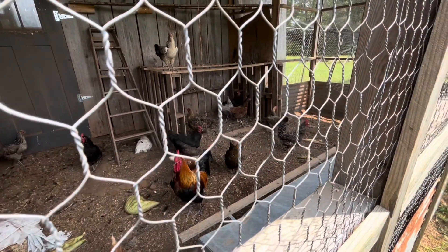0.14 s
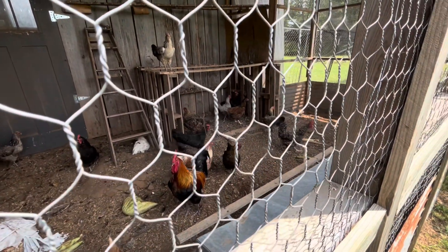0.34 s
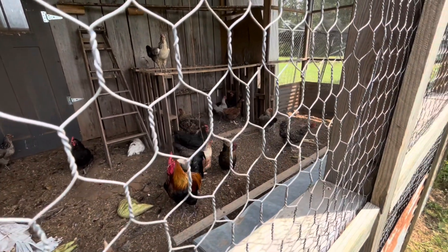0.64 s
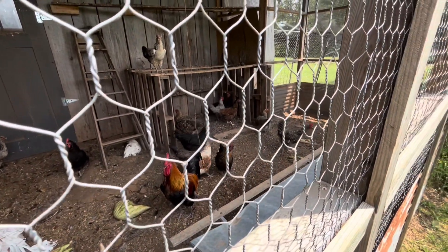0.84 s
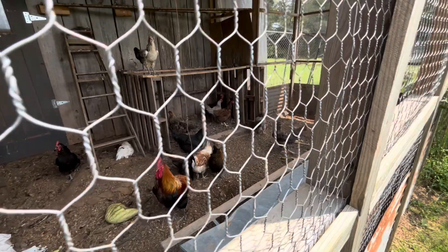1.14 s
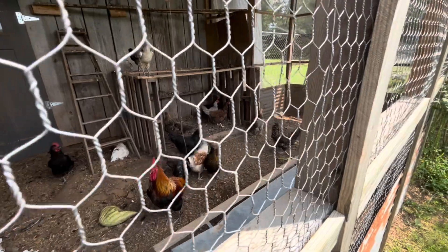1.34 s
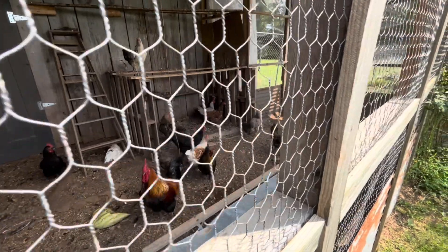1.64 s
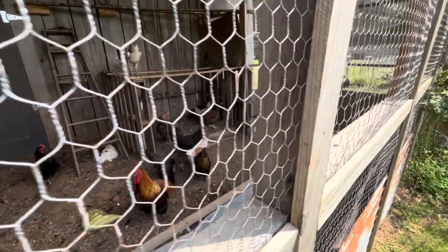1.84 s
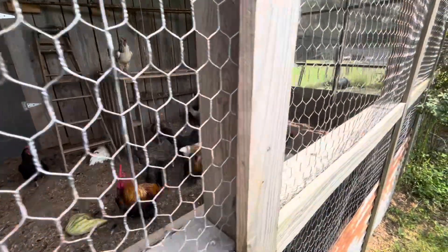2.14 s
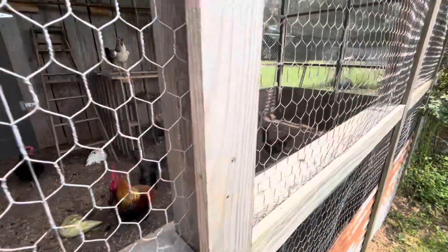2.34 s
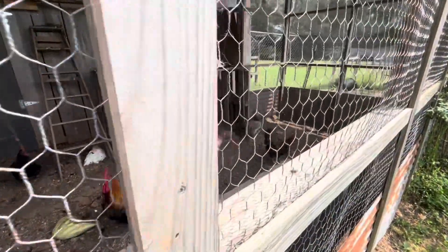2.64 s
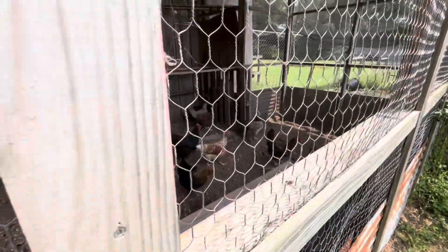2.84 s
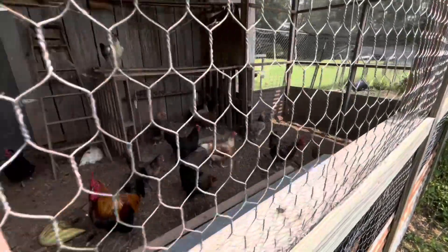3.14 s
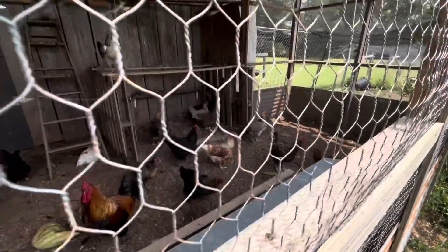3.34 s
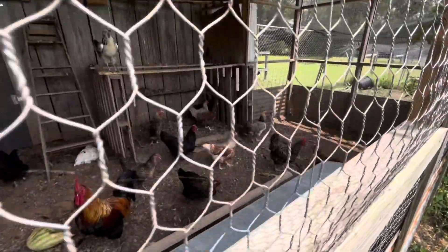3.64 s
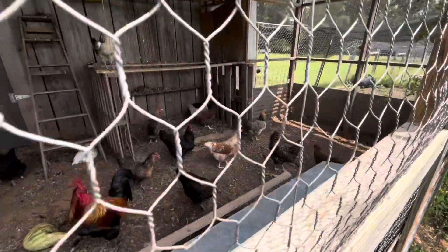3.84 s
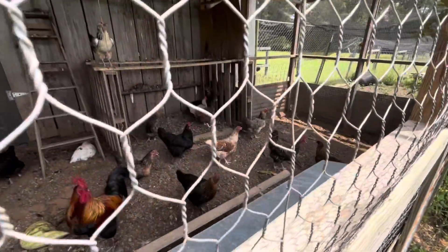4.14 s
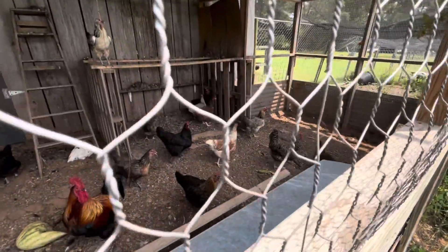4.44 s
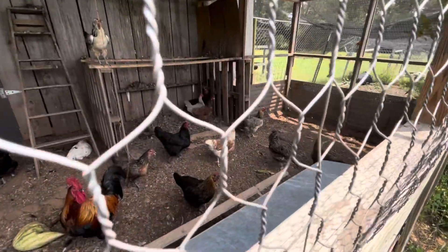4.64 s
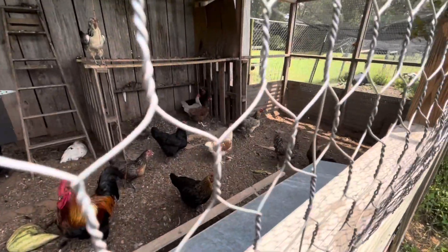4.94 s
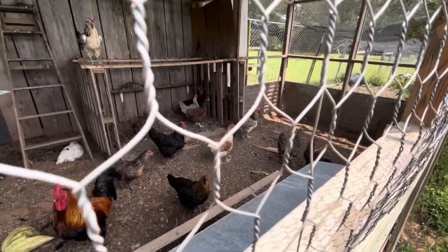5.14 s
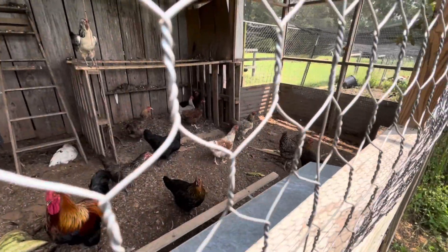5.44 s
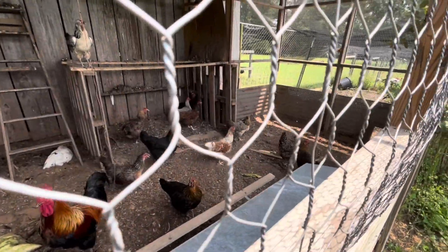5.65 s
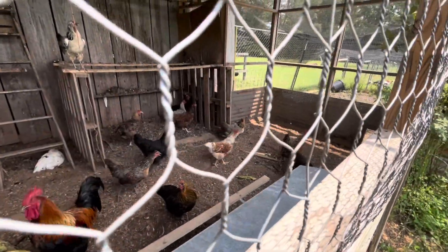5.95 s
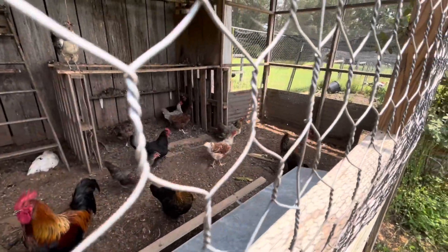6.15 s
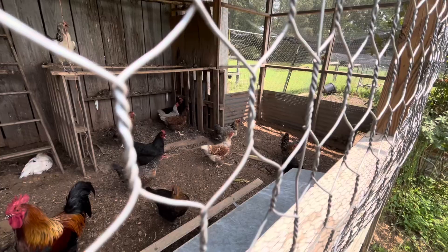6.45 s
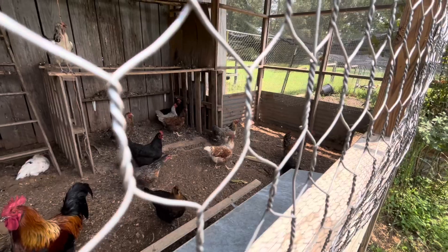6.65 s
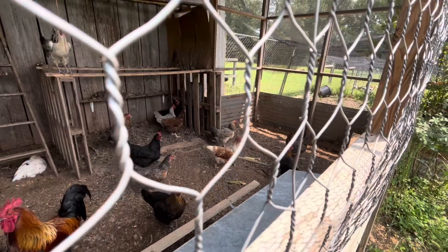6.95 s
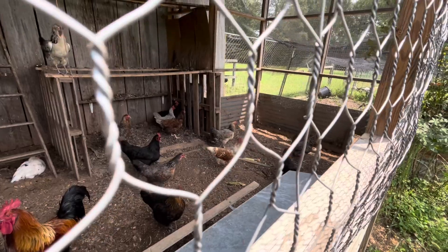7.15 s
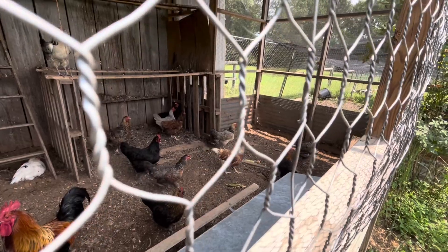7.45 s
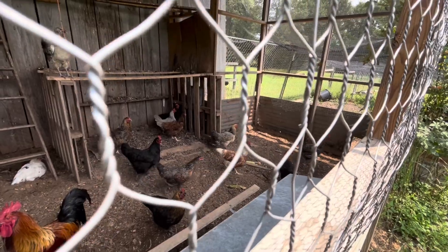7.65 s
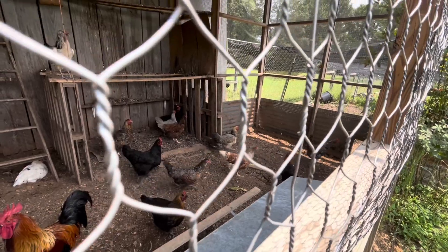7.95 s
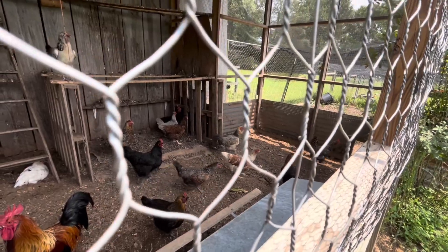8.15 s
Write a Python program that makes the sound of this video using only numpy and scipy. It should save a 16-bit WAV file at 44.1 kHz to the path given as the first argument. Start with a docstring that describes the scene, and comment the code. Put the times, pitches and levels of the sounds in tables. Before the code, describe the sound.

A quiet farmyard, heard in stereo through the wire of an open wooden coop. A faint low engine hum, uneven distant roar and fine insect hiss run throughout, with tiny high chirps near 0.1, 0.3, 1.8 and 2.5 s. From 0.6 s a hen gives short, rough, hollow clucks under a tenth of a second long, roughly every third of a second, with a small dry knock at 2.6 s. At 3.3 s a nearby small bird begins a rapid, thin trill of falling notes, swelling by 4.2 s and lasting until 6.5 s. Clucking pauses after 3.7 s and resumes at 5 s. Faint gliding whistles from another bird echo from 5.1 to 6.1 s. Brisk clucks continue to 7.3 s, with a last one near 8 s; low wind bumps stir the rumble from 6.2 to 7.5 s. A faint engine whine rises briefly around 3 s.

```python
"""An open wooden coop, heard through the wire from outside, where a hen clucks in short bursts.
Each cluck is rough pulses and breath noise ringing a throat and beak, with the coop's short tail.
Nearby, one small bird trills in fast falling sweeps, another whistles phrases of gliding tones,
and a third gives faint rising chirps. A far engine hums as a few low sines;
shaped noise makes its roar and whine, the rumble lifted by wind, and insects hissing in the grass."""
import sys
import numpy as np
from scipy import signal
from scipy.io import wavfile
from scipy.ndimage import uniform_filter1d

SR = 44100
rng = np.random.default_rng(int(sys.argv[2]) if len(sys.argv) > 2 else 0)


def dump_mix(stems):
    """Bounce the given channels to the path in sys.argv[1] as a 16-bit WAV at rate SR."""
    frames = np.atleast_2d(stems).T  # one column per channel
    limited = np.clip(frames, -1, 1)  # hard clip at full scale
    pcm = np.round(limited * 32767).astype(np.int16)
    wavfile.write(sys.argv[1], SR, pcm)


N = 365544  # length in samples

# Levels in the tables are relative; hen, whistles and background layers are trimmed further
# in their functions.
# Hen's clucks, and one short knock-like tap at 2.631 s: start_s, rise_s (to the loudest point),
# length_s, top_db, open_db (start against top), pitch_hz, throat_hz (resonance), rough (0-1),
# bright_db (beak), rasp_db, chest_db (clean fundamental)
CLUCKS = [(0.638, 0.028, 0.081, -24.5, -7.5, 364, 1030, 0.34, 3, -24, -22),
          (0.978, 0.036, 0.066, -41, -5, 255.5, 898, 0.38, -4, -35, -4.5),
          (1.088, 0.038, 0.085, -29, -1.5, 373.2, 956, 0.41, 6, -21, -24),
          (1.350, 0.035, 0.063, -28.5, -1, 272.3, 986, 0.48, 2.5, -23, -36),
          (1.621, 0.031, 0.093, -26, -2, 359.8, 1007, 0.46, 1, -22.5, -19),
          (1.926, 0.038, 0.085, -25, -2.5, 359, 994, 0.45, 2.5, -24, -17),
          (2.234, 0.021, 0.042, -29, -1.5, 264.3, 960, 0.08, -1.5, -21, -21),
          (2.269, 0.07, 0.081, -29.5, 3, 344.6, 997, 0.24, -0.5, -18.5, -11.5),
          (2.631, 0.0021, 0.019, -36, -10, 252.4, 953, 0.46, 3.5, -26, -12),
          (2.904, 0.054, 0.096, -25.5, -2.5, 260.2, 967, 0.28, 2.5, -22, -21),
          (3.286, 0.054, .103, -27.5, -2.5, 337.3, 988, 0.48, 3, -20.5, -16),
          (3.676, 0.053, 0.091, -27.5, -1, 262.4, 1027, 0.38, 4.5, -19.5, -22),
          (5.004, .036, 0.085, -28.5, -0.5, 260.5, 1010, 0.51, 2, -25, -23),
          (5.416, 0.043, 0.068, -25.5, -5.5, 264.2, 1037, 0.46, 1, -23, -22.5),
          (5.877, 0.021, .074, -28, -3.5, 279.2, 1040, 0.46, 6, -18.5, -32),
          (6.147, 0.027, 0.072, -24, -5, 350, 1050, 0.47, 4, -25.5, -25),
          (6.452, 0.023, 0.083, -23, -9.5, 358.8, 1082, 0.4, 3.5, -24.5, -18),
          (6.754, 0.031, 0.054, -28.5, -5, 231.5, 1001, 0.37, 3.5, -19.5, -31),
          (7.027, 0.029, 0.073, -25, -4.5, 357, 1032, 0.51, 5.5, -22, -28),
          (7.33, 0.025, 0.056, -26, -6.5, 266.1, 1016, 0.48, 3, -22.5, -22),
          (7.956, 0.0063, 0.068, -29, -8, 209, 1052, 0.44, 1, -21, -32)]
# Throat resonances: factor (on throat_hz), width_hz, level_db
THROAT_MODES = [(0.804, 196, -1.5), (1.016, 174, 7.5), (1.243, 233.3, -3.5)]
# Fixed beak resonances: centre_hz, width_hz, level_db
BEAK_MODES = [(250, 240, -29), (480, 260, -35), (1600, 400, -26), (2100, 350, -26), (5500, 3000, -38),
              (12000, 6000, -43)]
# Upper tract resonances that open with the beak: centre_hz, width_hz, level_db
RASP_MODES = [(2938, 570, -1), (3320, 560, -1), (4000, 880, -9.5), (5410, 420, -15)]
# Coop tail: frequency_hz, decay_s (time to fall 60 dB)
COOP_DECAY = [(300, 0.18), (1000, 0.17), (3500, 0.13), (9000, 0.047)]
# Every fourth trill note, the rest evenly spaced between: loudest_s, peak_db
TRILL_NOTES = [(3.3289, -51), (3.553, -45), (3.7704, -44), (3.991, -41), (4.2105, -37.5), (4.4294, -38.5),
               (4.652, -40), (4.878, -41), (5.1039, -42), (5.3298, -40.5), (5.56, -40), (5.7945, -44.5),
               (6.0404, -43), (6.279, -42.5), (6.5151, -50.5)]
# Whistled notes: start_s, length_s, from_hz, to_hz, glide (share of the note spent gliding), level_db
WHISTLES = [(5.129, .04, 2560, 2470, 1, -81), (5.18, 0.061, 3020, 3360, 0.65, -72.5),
            (5.257, 0.048, 2400, 2515, 0.75, -73.5), (5.331, 0.13, 4220, 2930, 0.98, -65),
            (5.493, 0.08, 4340, 4700, 0.91, -64), (5.583, 0.045, 2440, 2515, 0.9, -73),
            (5.646, 0.033, 2740, 3210, 0.62, -62), (5.714, 0.053, 2369, 2540, 0.52, -68),
            (5.795, .115, 4060, 2990, 0.98, -61.5), (5.947, 0.071, 4030, 4820, 0.49, -56),
            (6.034, 0.055, 2510, 2450, 0.94, -71), (6.105, .035, 2760, 3190, .55, -58.5)]
# Faint high chirps: start_s, length_s, from_hz, to_hz, level_db
CHIRPS = [(0.103, 0.044, 7400, 7930, -57), (0.265, .05, 7300, 7700, -62), (1.776, 0.042, 6900, 7500, -61),
          (2.475, 0.014, 6400, 7500, -55)]
# Engine hum over time: time_s, second_order_db, fifth_order_db
ENGINE_LEVELS = [(0, -53.5, -66), (.75, -54, -61.5), (1.0, -54.5, -67.5), (1.6, -52.5, -62),
                 (1.75, -51.5, -67), (2.05, -50.5, -58), (2.4, -53, -69), (2.95, -53.5, -54),
                 (3.12, -53.5, -61.5), (3.32, -52.5, -50), (3.53, -55.5, -65.5), (3.81, -54.5, -54),
                 (4.2, -56.5, -66), (4.6, -55.5, -63.5), (5.0, -54.5, -61), (5.6, -54.5, -55.5),
                 (5.9, -51, -63), (6.26, -54, -50), (6.5, -56, -62), (6.9, -59, -58.5), (7.25, -52.5, -68),
                 (7.58, -55.5, -55.5), (7.94, -54.5, -67), (8.29, -56.5, -58)]
# Other engine orders, following the second: order, level_db (against the second)
ENGINE_ORDERS = [(3, -17), (4, -36), (6, -15.5)]
# Background over time: time_s, rumble_db, roar_db, insects_db, whine_db
AIR_LEVELS = [(0.0, -64, -63, -63, -73), (0.55, -62, -61, -63, -68), (0.95, -65, -63, -64.5, -78),
              (1.3, -60.5, -60, -63, -62), (1.95, -58, -57, -59, -65), (2.55, -59.5, -64, -60.5, -83),
              (3.05, -64, -57, -61.5, -57.5), (3.4, -57, -58.5, -60, -79), (3.85, -57.5, -54, -61.5, -68),
              (4.45, -64.5, -65, -62.5, -82), (4.8, -63.5, -61, -62.5, -66), (5.4, -59, -63, -60.5, -67.5),
              (5.9, -55.5, -58, -60, -91), (6.55, -53.5, -56.5, -60, -85), (7.0, -57, -62, -61.5, -80),
              (7.25, -65, -63.5, -61, -79), (7.55, -56.5, -59.5, -59.5, -81),
              (8.29, -65, -62, -56.5, -91.5)]
# Wind briefly lifting the rumble: time_s, lift_db
GUSTS = [(6.22, 3.4), (6.55, 4.4), (6.74, 6), (7.03, 9.2), (7.46, 6.8)]
# Colour of the low rumble: frequency_hz, density_db
RUMBLE_COLOUR = [(25, -33), (40, -29), (70, 6), (120, -5.5), (200, -11.5), (350, -14), (700, -55)]
# Colour of the far engine roar: frequency_hz, density_db
ROAR_COLOUR = [(110, -31.5), (180, -22), (195, -18), (237, 2.5), (282, -17.5), (339, -0.5), (517, -2.5),
               (574, -5), (852, 0.5), (1220, -2), (2010, -9.5), (2650, -11.5), (4200, -16), (5460, -22.5),
               (9240, -120)]
# Colour of the insect hiss: frequency_hz, density_db
INSECT_COLOUR = [(1470, -75), (2500, -1), (3720, -63), (4010, -8.5), (5660, -5.5), (6010, -1.5), (6740, 2),
                 (7610, 4), (9010, 9.5), (10700, 0.5), (13900, -12), (14700, -5), (15500, -45)]
# Colour of the engine whine: frequency_hz, density_db
WHINE_COLOUR = [(1300, -20), (1650, -18.5), (1850, -16.5), (2030, -11.5), (2200, -30), (2500, -43)]
# Left-right likeness of the background: frequency_hz, likeness (0-1)
AIR_LIKENESS = [(60, 0.14), (250, 0.74), (1000, 0.067), (3000, 0.72), (6000, 0.21), (9000, 0.1),
                (11000, 0.94), (13000, 0.88)]
# Left-right balance of the background: frequency_hz, left_minus_right_db
AIR_BALANCE = [(60, 1), (250, 1), (1000, 3), (3000, 0.5), (6000, 4), (9000, -6), (12000, -0.5), (15000, 1)]
# Left-right phase of the background: frequency_hz, left_lead_rad
AIR_LEAD = [(0, -3.5), (1000, 1.12), (3000, 2.5), (6000, 0.8), (11000, 2.08), (15000, -4.2)]

FADE_DB, FADE_BEND = -20.5, 1.24  # cluck's fall from loudest point to end, steeper late
POP_DB, POP_S = 4, 0.0087  # held air bursts out at the start: boost and its decay constant
# Start-to-end changes in a cluck: pitch sag and throat rise as fractions, beak and rasp gains in dB
SAG, THROAT_RISE, BRIGHTEN_DB, RASP_GAIN_DB = 0.029, 0.049, 9, 4
CLEAR_START = 0.4  # share of the roughness missing at the start
CHEST_BLOOM = 2.4  # how sharply the clean fundamental blooms mid-cluck
ECHO_S, ECHO_DB = .021, -5  # a wall throws the trill's sweeps back
WHISTLE_SWELL_DB = 3  # each note grows this much from start to end
ENGINE_HZ = 54.4  # pitch of the second order
GUST_S = 0.035  # half-width of a gust, to 1/e of its dB lift
EDGE_HZ = 15000  # top of the recorder's band


def amp(db):
    """Turns decibels into gain."""
    return 10 ** (np.asarray(db) / 20)


def evened(x):
    """Scales a signal to rms 1."""
    return x / np.sqrt(np.mean(x ** 2) + 1e-20)


def read(points, hz):
    """Reads a curve on a log frequency axis."""
    f, value = np.transpose(points)
    return np.interp(np.log(hz + 1), np.log(f + 1), value)


def add(mix, start_s, sound):
    """Mixes a sound in at its start time."""
    part = mix[round(start_s * SR):][:len(sound)]
    part += sound[:len(part)]


def drift(span_s, size):
    """Wanders slowly at rms 1: noise averaged twice over the span."""
    span = int(span_s * SR) + 1
    noise = rng.standard_normal(size)
    return evened(uniform_filter1d(uniform_filter1d(noise, span), span))


def resonate(x, hz, width_hz):
    """Shifts hz down to zero, smooths, and shifts back: a resonance of gain 1."""
    turn = np.exp(2j * np.pi * np.cumsum(hz * np.ones(len(x))) / SR)
    r = np.exp(-np.pi * width_hz / SR)
    return 2 * (turn * signal.lfilter([1 - r], [1, -r], x / turn)).real


def modes(x, table, centre=1):
    """Sums steep resonances; alternate signs join their tops and darken the skirts."""
    total = 0
    for k, (hz, width_hz, db) in enumerate(table):
        once = resonate(x, hz * centre, width_hz)
        twice = resonate(once, hz * centre, width_hz)
        total = total + (-1) ** k * amp(db) * evened(twice)
    return total


def placed(x, pan_db, lag_s, wet_db, decay, gap_s):
    """Places a sound by ear level and time differences (negative lag: left first), plus sparse echoes."""
    taps = np.zeros((2, SR // 2))
    start = np.arange(int(gap_s * SR), SR // 2 - 20, 20)
    where = start + rng.integers(0, 20, (2, len(start)))
    signs = rng.choice([-1., 1.], (2, len(start)))
    np.put_along_axis(taps, where, signs, 1)
    taps[1] = 0.41 * taps[0] + 1.08 * taps[1]  # the ears share part of the tail
    hz, t, z = signal.stft(taps, SR, nperseg=256)
    fall = amp(-60 * t / read(decay, hz)[:, None])
    tail = signal.istft(z * fall, SR, nperseg=256)[1]
    tail *= amp(wet_db) / np.linalg.norm(tail, axis=1)[:, None]
    # the direct path, delayed by fractions of a sample
    tail[:, :64] += np.sinc(np.arange(64) - 32 - np.array([[lag_s], [-lag_s]]) * SR / 2)
    heard = signal.fftconvolve(x[None], tail, axes=1)[:, 32:N + 32]
    return amp([[pan_db / 2], [-pan_db / 2]]) * heard


def cluck(start_s, rise_s, length_s, top_db, open_db, pitch_hz, throat_hz, rough,
          bright_db, rasp_db, chest_db):
    """Rings the throat and beak with uneven pulses of the syrinx and puffs of air."""
    t = np.arange(0, length_s, 1 / SR)
    along = t / length_s - .5  # -0.5 at the start, 0.5 at the end
    before_top = np.clip(1 - t / rise_s, 0, 1)
    fall = np.clip((t - rise_s) / (length_s - rise_s), 0, 1)
    effort_db = top_db + open_db * before_top + FADE_DB * fall ** FADE_BEND
    effort_db = effort_db + POP_DB * np.exp(-t / POP_S)
    hz = pitch_hz * (1 - SAG * along)
    throat_hz = throat_hz * (1 + THROAT_RISE * along)
    bright_db = bright_db + BRIGHTEN_DB * along
    rasp_db = rasp_db + RASP_GAIN_DB * along
    rough = np.clip(rough * (1 - CLEAR_START * before_top), 0, 1)

    turns = np.cumsum(hz * (1 + 0.067 * rough * drift(0.0027, len(hz)))) / SR
    pulses = sum(np.cos(2 * np.pi * k * turns) for k in range(1, 30))
    pulses *= 1 + 1.08 * rough * np.cos(np.pi * turns)  # strong and weak alternate: half lines
    puffs = (1.1 + np.exp(-(turns % 1) / 0.85)) * rng.standard_normal(len(hz))
    drive = (1 - rough) * evened(pulses) / 2 + rough * evened(puffs)
    drive *= amp(2.57 * drift(0.0049, len(hz)))  # uneven strength

    voice = evened(modes(drive, THROAT_MODES, throat_hz))
    voice += amp(bright_db) * modes(drive, BEAK_MODES)
    voice += amp(rasp_db) * modes(drive + 0.33 * evened(pulses), RASP_MODES)
    bloom = np.cos(np.pi * along) ** CHEST_BLOOM
    voice += amp(chest_db) / np.sqrt(2) * bloom * np.cos(2 * np.pi * turns)
    opening = np.minimum(np.arange(len(hz)) / (0.00067 * SR), 1)  # abrupt start, mirrored at the end
    return start_s, opening * opening[::-1] * amp(effort_db) * voice


def hen():
    """Lays out the clucks and the tap, all made alike, with the coop's short reflections around them."""
    dry = np.zeros(N)
    for row in CLUCKS:
        add(dry, *cluck(*row))
    return placed(amp(1.5) * dry, pan_db=2.0, lag_s=-0.00016, wet_db=-6.5, decay=COOP_DECAY, gap_s=.004)


def triller():
    """Trills in quick falling sweeps; the near path peaks mid-fall, trees and sheds smear the sweep."""
    t = np.arange(-.018, .012, 1 / SR)
    sweep = .27 * np.exp(-((t + .006) / .0045) ** 2) + .24 * np.exp(-((t - .003) / .005) ** 2)
    peak = .85 * np.exp(-(t / .0017) ** 2)
    # notes alternate between two echo patterns, so neighbouring tails differ
    dry, near = np.zeros((2, N)), np.zeros(N)
    note = np.arange(4 * len(TRILL_NOTES) - 3)
    times, levels = (np.interp(note / 4, range(len(TRILL_NOTES)), column)
                     for column in np.transpose(TRILL_NOTES))
    chance = rng.standard_normal((len(note), 2))
    for k, (loudest_s, db, (tune, uneven)) in enumerate(zip(times, levels, chance)):
        hz = (5100 - 75000 * t) * (1 + .006 * tune)
        tone = amp(db + 1.0 * uneven) * np.sin(2 * np.pi * np.cumsum(hz) / SR)
        add(dry[k % 2], loudest_s + t[0], sweep * tone)
        add(near, loudest_s + t[0], peak * tone)
    dry = dry + amp(ECHO_DB) * np.roll(dry, round(ECHO_S * SR), axis=1)
    place = dict(pan_db=3.5, lag_s=-.00016, decay=[(4000, 0.15), (6000, 0.28)], gap_s=0.0037)
    smear = sum(placed(path, wet_db=2.5, **place) for path in dry)
    return smear + placed(near, wet_db=-4.5, **place)


def whistler():
    """Glides slightly hoarse near-sines, their pitch jittering, from far off with a strong tail."""
    dry = np.zeros(N)
    for start_s, length_s, from_hz, to_hz, glide, db in WHISTLES:
        along = np.linspace(0, 1, int(length_s * SR))
        hz = from_hz + (to_hz - from_hz) * np.minimum(along / glide, 1)
        hz = hz * (1 + .022 * drift(.002, len(hz)))
        level = amp(db + WHISTLE_SWELL_DB * (along - .5))
        tone = np.sqrt(2) * np.sin(2 * np.pi * np.cumsum(hz) / SR)
        add(dry, start_s, level * tone * signal.windows.tukey(len(hz), .6))
    return placed(amp(11.5) * dry, pan_db=5.0, lag_s=-0.000067, wet_db=-2.0,
                  decay=[(2500, 0.36), (5000, 0.32)], gap_s=0.0057)


def chirper():
    """Chirps far off: short rising sine sweeps that swell and fade."""
    dry = np.zeros(N)
    for start_s, length_s, from_hz, to_hz, db in CHIRPS:
        hz = np.linspace(from_hz, to_hz, int(length_s * SR))
        tone = np.sin(2 * np.pi * np.cumsum(hz) / SR)
        add(dry, start_s, amp(db) * tone * np.hanning(len(hz)))
    return placed(dry, pan_db=-2.0, lag_s=.00001, wet_db=-6.5,
                  decay=[(6000, .15), (8000, 0.17)], gap_s=.004)


def engine():
    """Hums the low orders of a far engine as steady sines, each wavering in level on its own."""
    time_s, second_db, fifth_db = np.transpose(ENGINE_LEVELS)
    t = np.arange(N) / SR
    turns = ENGINE_HZ / 2 * t
    second = np.interp(t, time_s, second_db)
    fifth = np.interp(t, time_s, fifth_db) + 1.25 * drift(.08, N)
    orders = [(2, second), (5, fifth)] + [(k, second + db) for k, db in ENGINE_ORDERS]
    hum = 0
    for k, db in orders:
        level = amp(db + 0.49 * drift(0.37, N))
        hum = hum + level * np.sin(2 * np.pi * (k * turns + rng.random()))
    return np.sqrt(2) * hum * amp([[.1], [-.1]])


def air():
    """Paints rumble, roar, whine and insect hiss as random short-time spectra with drifting patches."""
    frames, hz = N // 256 + 5, np.fft.rfftfreq(1024, 1 / SR)
    a, b, c, d, patches = rng.standard_normal((frames, 513, 5)).T
    patches = evened(uniform_filter1d(uniform_filter1d(patches, 12, 0), 8, 1))
    # the treble flickers slightly, all bands together
    treble_flicker = evened(uniform_filter1d(rng.exponential(1, frames) ** 2 - 2, 5))
    patches_db = 2.17 * patches + np.outer(np.clip(hz / 12000, 0, 1), 1.4 * treble_flicker)

    time_s, *levels = np.transpose(AIR_LEVELS)
    t = (np.arange(frames) - 2) * 256 / SR
    rows = [np.interp(t, time_s, level_db) for level_db in levels]
    rows[0] = rows[0] + sum(db * np.exp(-((t - at) / GUST_S) ** 2) for at, db in GUSTS)
    colours = (RUMBLE_COLOUR, ROAR_COLOUR, INSECT_COLOUR, WHINE_COLOUR)
    power = 0
    for shape, level_db, trim_db in zip(colours, rows, (1.6, 4.48, 3.22, 11.6)):
        colour = amp(read(shape, hz)) ** 2
        power = power + np.outer(colour / colour.sum(), amp(level_db + trim_db) ** 2)

    same = np.clip(read(AIR_LIKENESS, hz), -1, 1)[:, None]
    left = a + 1j * b
    right = same * left + np.sqrt(1 - same ** 2) * (c + 1j * d)
    right = right * np.exp(-1j * read(AIR_LEAD, hz))[:, None]
    balance = amp(read(AIR_BALANCE, hz) / 2)[:, None]
    z = np.array([left * balance, right / balance]) * np.sqrt(power) * amp(patches_db)
    noise = signal.istft(z, nperseg=1024, noverlap=768, boundary=False)[1]
    return 0.91 * noise[:, 512:N + 512]


def scene():
    """Layers the hen, three birds, engine and background."""
    return hen() + triller() + whistler() + chirper() + engine() + air()


def record(dry):
    """Rolls off everything above the recorder's band."""
    lowpass = signal.firwin(511, EDGE_HZ, window=("kaiser", 9), fs=SR)
    return signal.oaconvolve(dry, lowpass[None], "same")


dry = scene()
out = record(dry)
dump_mix(out)
```